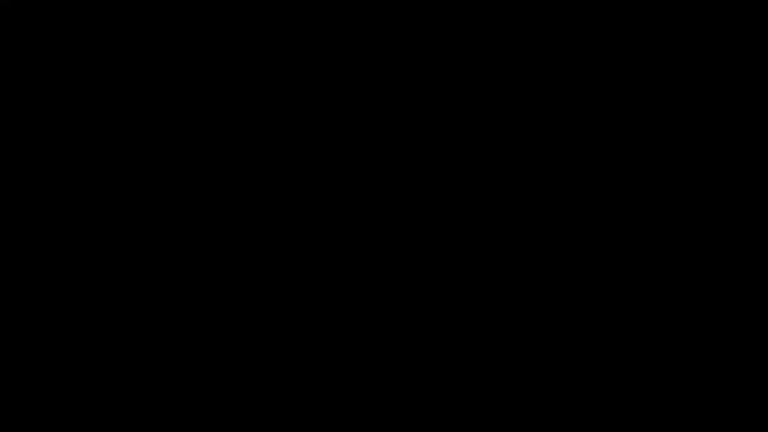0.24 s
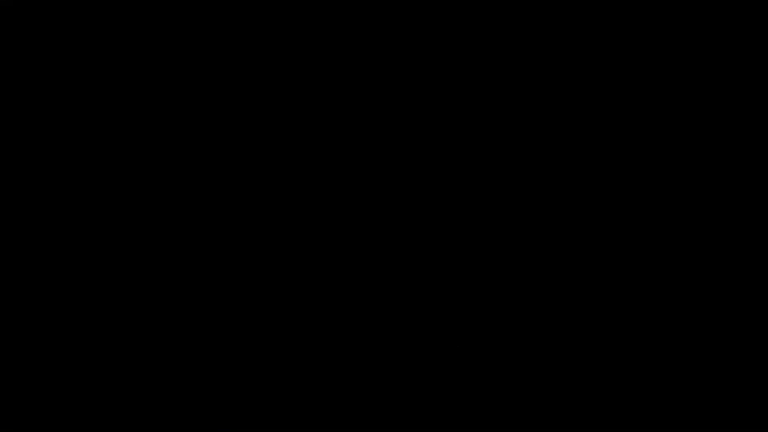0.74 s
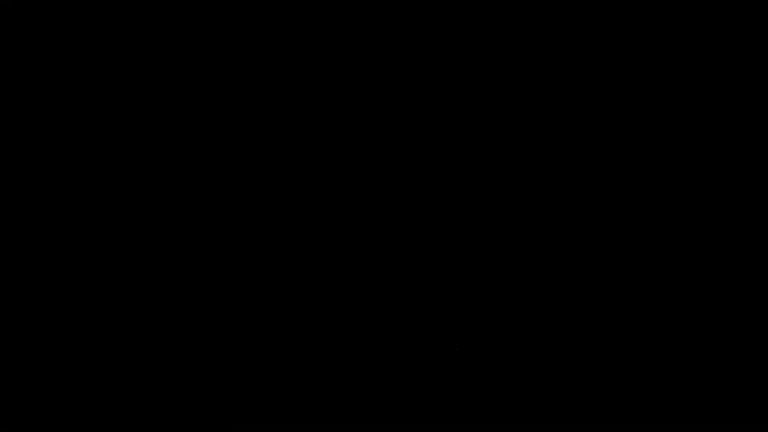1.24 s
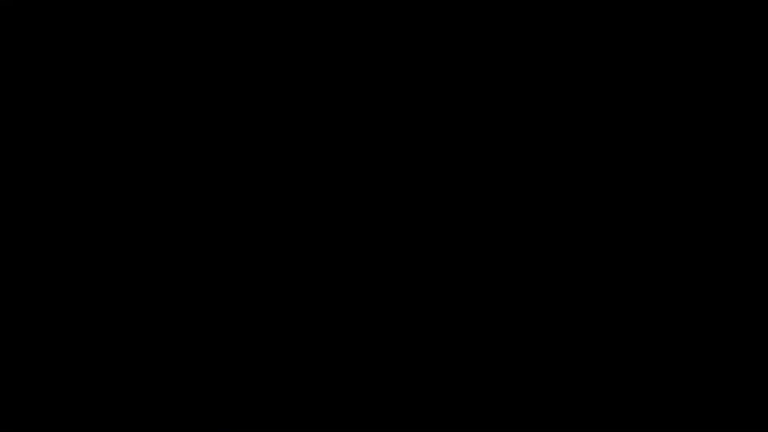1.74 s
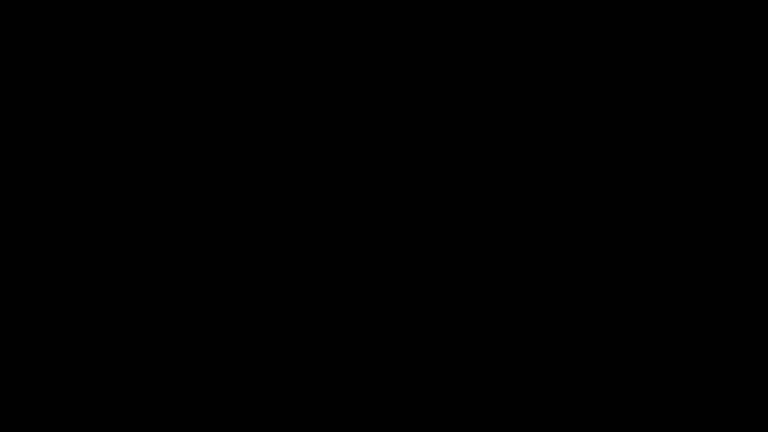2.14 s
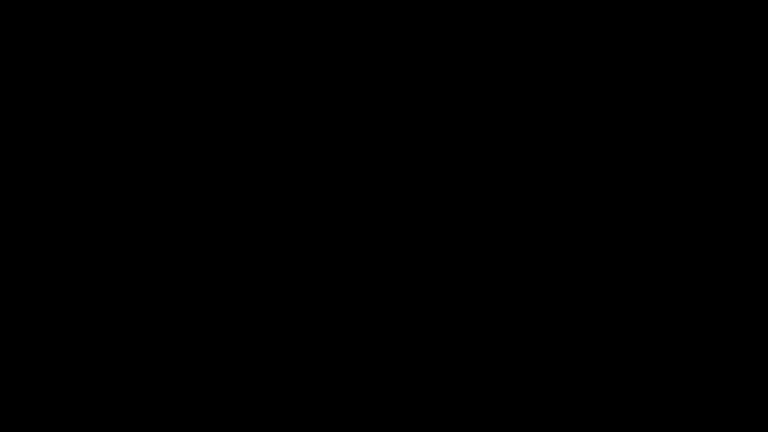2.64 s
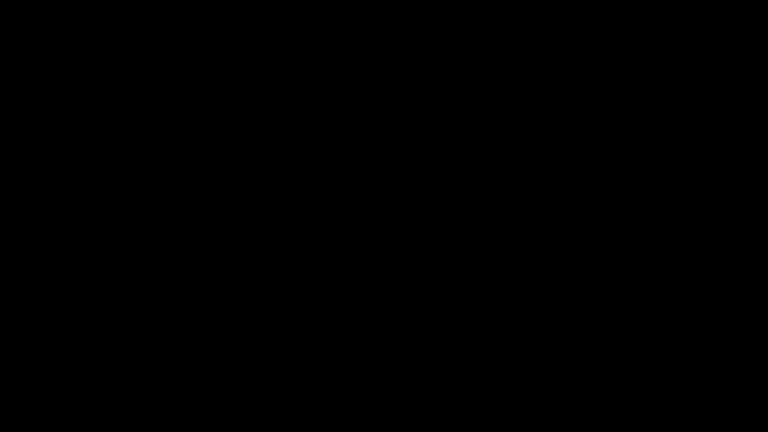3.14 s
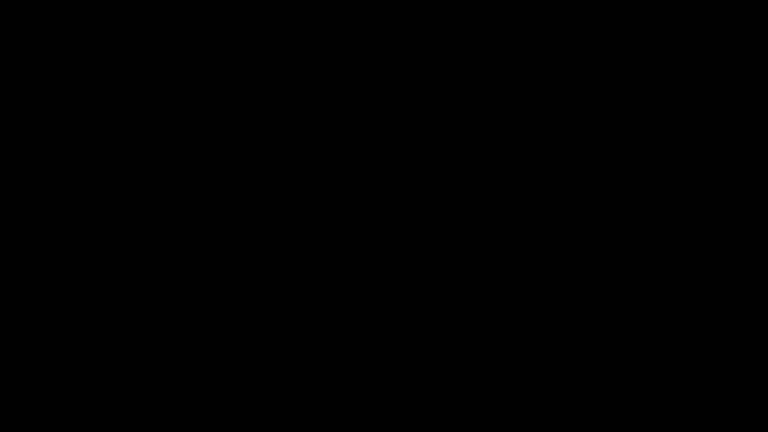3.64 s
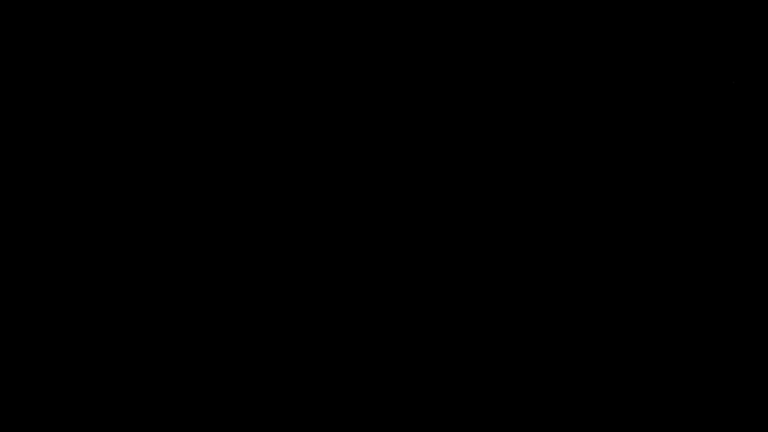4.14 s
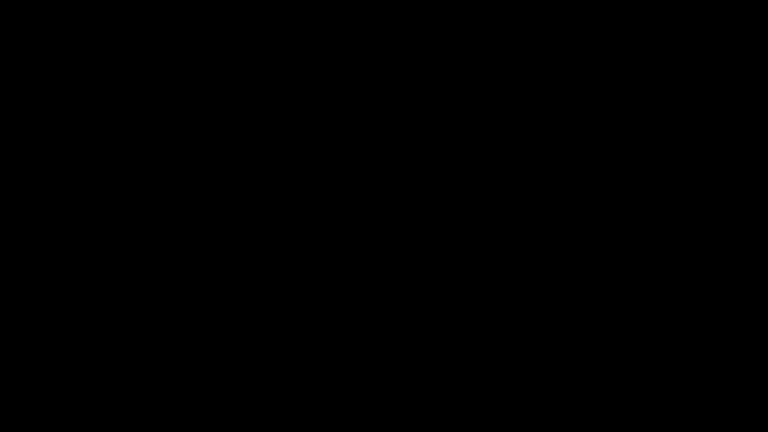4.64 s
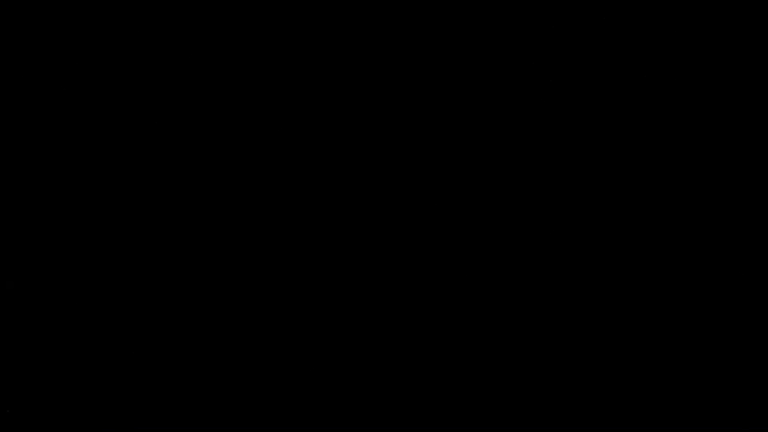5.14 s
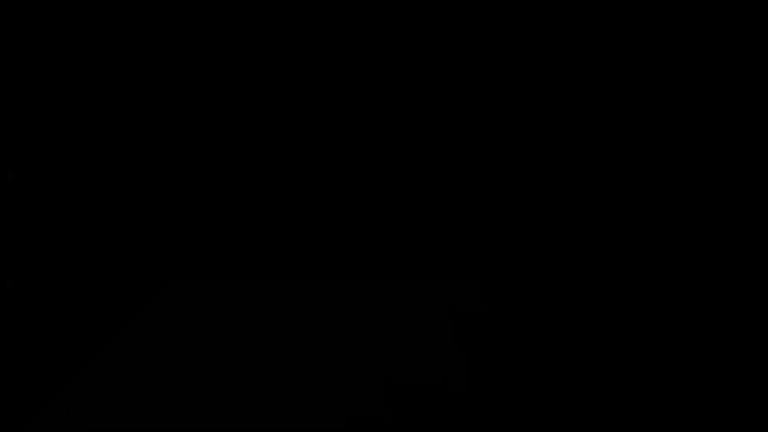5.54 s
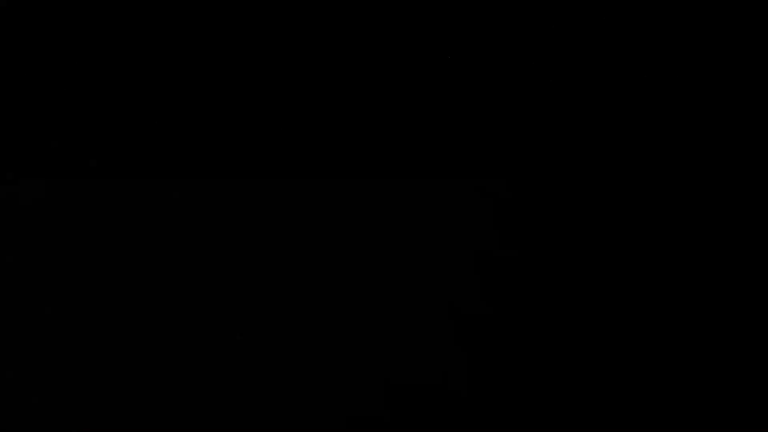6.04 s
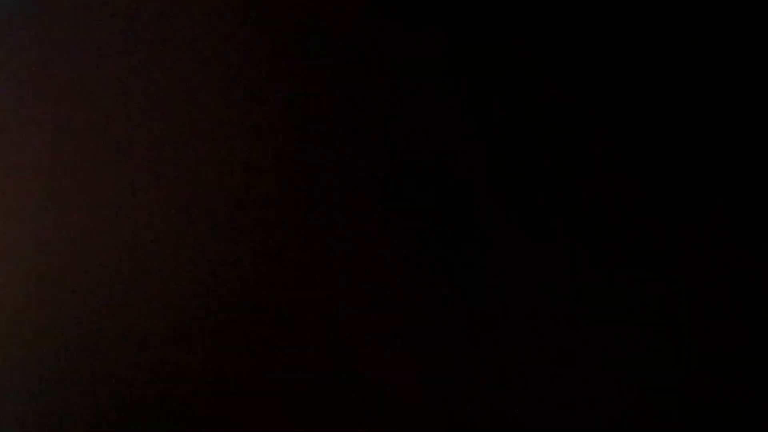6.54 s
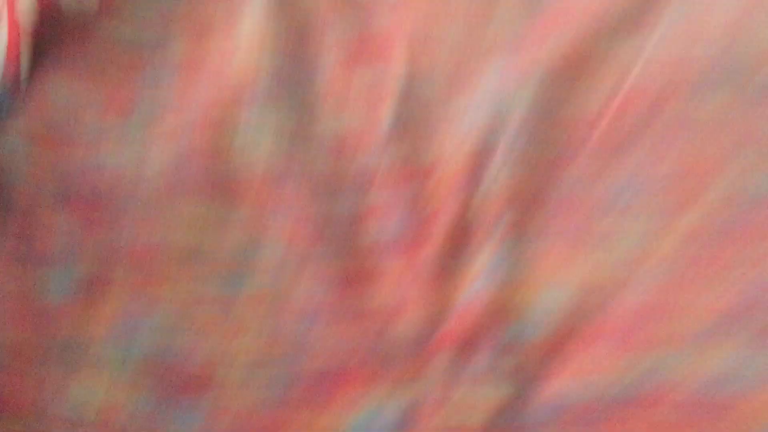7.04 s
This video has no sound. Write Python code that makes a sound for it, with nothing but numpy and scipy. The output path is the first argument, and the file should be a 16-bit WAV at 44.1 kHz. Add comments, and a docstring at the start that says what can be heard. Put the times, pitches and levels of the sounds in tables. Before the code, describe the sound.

Very close to the microphone in a small, quiet room with a steady low hum, fingers tick and scuff on thin plastic. The catch cracks open sharply with a low thud. The case slides with crinkles, clicks and rasps, growing busier and brighter. Cloth and bumps rumble against the microphone, the case clacks down hard, then violent overloaded thumps follow as the recorder is picked up, and it falls back to near quiet.

```python
"""Plastic case handled in a small room

A plastic case is fingered close to a microphone, snaps open, slides about crinkling, then clacks down.
Contacts are noise bursts through resonances; rubbing is random slips; jolts are decaying sines.
The recorder is picked up: cloth rubs on it as shaped noise, and bumps swing low and overload it.
A mains hum of two sines and a faint hiss lie beneath."""
import sys
import numpy as np
from scipy import signal
from scipy.fft import rfft, irfft, next_fast_len
from scipy.io import wavfile
from scipy.ndimage import uniform_filter1d, map_coordinates

SR = 44100
rng = np.random.default_rng(int(sys.argv[2]) if len(sys.argv) > 2 else 0)


def transcribe(signal):
    """Save signal, clipped to [-1, 1], as a 16-bit WAV file at the path in sys.argv[1]."""
    frames = np.atleast_2d(signal).T
    limited = np.clip(frames, -1, 1)
    pcm = np.round(limited * 32767).astype(np.int16)
    wavfile.write(sys.argv[1], SR, pcm)


N = 321048

# All tabulated levels are relative: each source sets its own final gain.
# resonances of thin plastic edges: f/Hz, level/dB
EDGE = [(200, -16.5), (700, 1), (1200, -3), (1900, -14.5), (2700, -5.5), (3700, -3.5), (5000, -13.5),
        (6600, -3.5), (10000, -13), (15000, -4)]
# fingertips scuffing the case: t/s, length/s, level/dB, brightness f/Hz
SCUFFS = [(0, 0.04, -60, 3240), (0.068, 0.032, -46, 1570), (0.115, 0.1, -66, 3650),
          (.383, 0.092, -67, 5940), (0.664, 0.39, -61, 3940), (1.026, 0.43, -60, 3900),
          (1.394, 0.15, -56, 3830), (1.608, 0.14, -57, 3470), (1.952, 0.27, -72, 2007),
          (2.306, 0.33, -62, 3500), (5.303, 0.14, -67, 1870), (5.441, 0.11, -60.5, 1700),
          (5.607, 0.095, -66, 1850), (6.272, 0.033, -54, 2330), (7.233, 0.025, -55, 3000)]
# steady drag of the sliding plastic: t/s, level/dB
SLIDE = [(2.55, -57.5), (2.82, -54.5), (3.23, -46), (3.68, -48.5), (3.92, -39.5), (4.2, -42), (4.36, -37),
         (4.52, -33.5), (4.88, -76)]
# upper spectrum of touches on the recorder: f/Hz, level/dB
CLOTH_HIGH = [(400, -6.5), (1200, -9), (2500, -3.5), (4500, -8.5), (8000, -16), (11000, -19),
              (16000, -24.5)]


def amp(db):
    """Level to amplitude: 20 dB is a factor of ten."""
    return 10 ** (np.asarray(db) / 20)


def unit(x):
    """Normalisation to a root mean square of 1."""
    return x / np.sqrt(np.mean(x ** 2) + 1e-20)


def along(points, hz):
    """Interpolation of (f/Hz, value) points on a logarithmic frequency axis."""
    f, v = np.transpose(points)
    return np.interp(np.log(hz + 1), np.log(f + 1), v)


def gains(rows):
    """Envelopes linear in decibels: one gain per sample for each level column, silent outside the rows."""
    s, *columns = np.transpose(rows)
    now = np.arange(N) / SR
    inside = np.interp(now, s, np.ones(len(s)), 0, 0)
    return [inside * amp(np.interp(now, s, column)) for column in columns]


def gestures(rows, attack_s, release_s):
    """Exponential rise, hold and decay of (t/s, length/s, level/dB, ..) rows, overlaps adding in power."""
    power = np.zeros((len(rows[0]) - 2, N))
    t = np.arange(SR * 3 // 2) / SR
    for s, length, *levels in rows:
        rise = 1 - np.exp(-t / attack_s)
        shape = rise * np.exp(-np.maximum(t - length, 0) / release_s)
        for track, db in zip(power, levels):
            add(track, s, (amp(db) * shape) ** 2)
    return np.sqrt(power)


def wobble(rate):
    """Slow random modulation: a spline through normal noise, rate knots a second."""
    knots = rng.standard_normal(int(N * rate / SR) + 4)
    return map_coordinates(knots, [np.arange(N) * rate / SR])


def filtered(x, response):
    """Linear filtering: the spectrum of x times a response of frequency."""
    m = next_fast_len(N + SR // 2)
    return irfft(rfft(x, m) * response(np.fft.rfftfreq(m, 1 / SR)), m)[:N]


def coloured(x, tone):
    """Spectral shaping of x by a (f/Hz, level/dB) curve, at rms 1."""
    return unit(filtered(x, lambda hz: amp(along(tone, hz))))


def add(track, s, sound):
    """Superposition of a sound on a track from time s, in place."""
    part = track[max(round(s * SR), 0):][:len(sound)]
    part += sound[:len(part)]


def centred(hz, bright_hz, octaves):
    """Contact brightness as a broad bell on log frequency: harder contacts sit higher."""
    return 1 / (1 + (np.log2((hz + 20) / bright_hz) / octaves) ** 2)


def contacts(rows, tone, t60, octaves, ripple_db, size=2048):
    """Impact excitation: a brief crack through the body's resonances, for rows of t/s, level/dB, f/Hz."""
    out = np.zeros(N)
    t = np.arange(size) / SR
    hz = np.fft.rfftfreq(size, 1 / SR)
    # folding the cepstrum gives minimum phase: the body rings only after the blow
    fold = np.r_[1, np.full(size // 2 - 1, 2), np.zeros(size // 2)]
    fade = amp(-60 * t / t60)
    fade_out = np.cos(np.pi / 2 * t / t[-1]) ** 2
    for s, db, bright_hz in rows:
        # each spot favours other modes
        ripple = unit(uniform_filter1d(rng.standard_normal(len(hz)), size=25))
        shape = amp(ripple_db * ripple) * amp(along(tone, hz)) * centred(hz, bright_hz, octaves)
        body = np.exp(rfft(irfft(np.log(shape)) * fold))
        crack = rfft(fade * rng.standard_normal(size))
        # a blow excites all bands alike
        crack /= np.sqrt(uniform_filter1d(np.abs(crack) ** 2, size=31))
        ring = irfft(crack * body) * fade_out
        add(out, s, amp(db) * unit(ring) * np.sqrt(np.mean(fade ** 2)))
    return out


def friction(rate, spread_db, smooth):
    """Stick-slip friction: tiny slips of very unequal size, rate a second, over a smooth hiss."""
    slips = (rng.random(N) < rate / SR) * rng.standard_normal(N)
    slips = slips * amp(spread_db * np.minimum(rng.exponential(size=N), 3))
    grain = np.exp(-np.arange(96) / 20) * rng.standard_normal(96)
    # each slip lends its decaying energy to fresh noise
    scatter = np.sqrt(np.abs(signal.fftconvolve(slips ** 2, grain ** 2)[:N]))
    clumps = unit(scatter * rng.standard_normal(N))
    return unit(clumps + smooth * rng.standard_normal(N))


def patchy(x, depth_db):
    """Shifting contact point: the resonances that speak come and go, as a random gain in time and frequency."""
    z = signal.stft(x, nperseg=512)[2]
    field = uniform_filter1d(rng.standard_normal(z.shape), size=9, axis=0)
    field = uniform_filter1d(field, size=10, axis=1)
    return unit(signal.istft(z * amp(depth_db * unit(field)), nperseg=512)[1][:N])


def background():
    """Mains hum at twice the line rate with a weak subharmonic, plus broadband air noise."""
    # hum, steady until the recorder is moved: t/s, level/dB
    hum_level = [(0, -43.5), (4.95, -43), (5.35, -50.5), (5.8, -41), (6.4, -43), (6.75, -60.5), (7, -57),
                 (7.28, -44.5)]
    # faint air noise of the room: f/Hz, level/dB
    air_tone = [(30, -5.5), (60, -5), (200, -8), (450, -22.5), (1000, -26), (1800, -24), (3200, -23.5),
                (6000, -29.5), (10000, -39), (16000, -39.5)]
    phase = 2 * np.pi * np.cumsum(118.6 + 0.24 * wobble(3.3)) / SR
    tones = np.sin(phase) + amp(-20.5) * np.sin(phase / 2)
    hum = gains(hum_level)[0] * np.sqrt(2) * tones
    return hum + amp(-65.5) * coloured(rng.standard_normal(N), air_tone)


def room(x):
    """Diffuse reverberation: noise that builds in a few milliseconds and decays fastest at the top."""
    # decay times of the room: f/Hz, t60/s
    decay = [(100, 0.45), (260, 0.18), (700, 0.35), (1840, 0.32), (4850, 0.25), (12800, 0.067)]
    hz, t, z = signal.stft(rng.standard_normal(SR * 3 // 4), SR, nperseg=256)
    fade = amp(-60 * t / along(decay, hz)[:, None])
    tail = signal.istft(z * fade, SR, nperseg=256)[1]
    tail = tail * (1 - np.exp(-np.arange(len(tail)) / SR / 0.004))
    return signal.fftconvolve(x, tail / np.linalg.norm(tail))[:N]


def handling():
    """Rubbing noise: hands rustle low on the case, and cloth drags over the recorder in lumps."""
    # hands shifting their grip: t/s, length/s, level/dB
    grip_rows = [(.05, .12, -50.5), (.4, .7, -62.5), (1.2, 0.39, -48.5), (1.75, 0.59, -51.5),
                 (2.56, .32, -47), (3.09, 0.11, -40), (3.78, .08, -49), (4.15, .4, -50.5),
                 (4.64, 0.041, -44), (5.02, 0.21, -45), (5.45, 0.23, -50), (5.78, .6, -48.5),
                 (6.52, 0.061, -42), (6.66, .08, -46), (6.93, .04, -47), (7.2, 0.088, -46)]
    # spectrum of the grip: f/Hz, level/dB
    grip_tone = [(25, -10.5), (55, 5.5), (110, 5), (200, -1), (300, -9.5), (500, -22), (1200, -22),
                 (3000, -45)]
    # cloth rubbing on the recorder: t/s, length/s, rumble level/dB, hiss level/dB
    cloth_rows = [(4.974, 0.017, -34.5, -54.5), (4.996, 0.071, -30.5, -44.5), (5.064, 0.16, -24.5, -39.5),
                  (5.134, 0.028, -15.5, -30.5), (5.23, 0.031, -41.5, -45.5), (6.37, .07, -36, -50.5),
                  (6.45, 0.086, -42.5, -59), (6.56, 0.081, -48.5, -62), (6.62, 0.12, -45, -51.5),
                  (6.74, .1, -62.5, -54.5), (6.84, 0.095, -72, -59), (6.935, 0.016, -52, -63)]
    # spectrum of the cloth rumble: f/Hz, level/dB
    rumble_tone = [(25, -12), (60, -1), (130, 0), (300, -5), (600, -9), (1200, -15), (2500, -27),
                   (5000, -50)]
    resting = amp(-59.5)  # the hands held still
    grip = resting + gestures(grip_rows, attack_s=0.016, release_s=0.027)[0] * amp(-1.5)
    sway = amp(8.9 * np.tanh(wobble(8.2)))
    rustle = grip * sway * coloured(rng.standard_normal(N), grip_tone)
    rumble, hiss = gestures(cloth_rows, attack_s=0.0039, release_s=0.014)
    lumps = amp(4.5 * np.tanh(wobble(90)) - 1)
    low = rumble * lumps * coloured(rng.standard_normal(N), rumble_tone)
    fibres = coloured(friction(rate=2500, spread_db=0.5, smooth=1.2), CLOTH_HIGH)
    return rustle + low + hiss * amp(1) * np.sqrt(lumps) * fibres


def bumps():
    """Softening contact: each bump on the recorder is a heavy swing gliding to 85 Hz, with a small click."""
    # bumps on the recorder's body: t/s, level/dB, starting f/Hz, time to peak/s, click level/dB
    bump_rows = [(1.362, -35.5, 300, .0096, -70), (1.442, -36, 307, 0.013, -70),
                 (5.015, -17.5, 696, 0.003, -54.5), (5.043, -11.5, 153, 0.0048, -41),
                 (5.0908, 0, 200, 0.0043, -52), (5.1317, -3.5, 790, 0.0028, -17),
                 (5.16, -10.5, 1224, 0.0019, -13), (5.1639, -2, 190, 0.0021, -34),
                 (6.39, -12.5, 397, 0.0012, -34), (6.3942, 2.5, 1110, 0.0018, -7),
                 (6.399, 4.5, 240, .003, -8.5), (6.411, 9, 804, 0.0028, -8), (6.4268, 0, 666, 0.0012, -17),
                 (6.43, 11.5, 271.7, .0034, -21.5), (6.4882, -13, 710, 0.0037, -30.5),
                 (6.504, -13, 970, 0.0018, -16), (6.508, -3.5, 161, 0.0037, -39),
                 (6.638, -25, 790, 0.0027, -41), (6.722, -32, 597, 0.0027, -35)]
    out = np.zeros(N)
    t = np.arange(SR // 6) / SR
    for s, db, start_hz, swell, _ in bump_rows:
        u = t / swell
        hz = 85 + (start_hz - 85) * np.exp(-u / 1.055)
        envelope = u * np.exp((1 - u ** 1.25) / 1.25)
        swing = envelope * np.sin(2 * np.pi * np.cumsum(hz) / SR)
        # the whole body also rocks in the hand
        sway = amp(-16 - 60 * t / 0.09) * np.sin(2 * np.pi * 55 * t)
        add(out, s, amp(db) * (swing + sway))
    clicks = [(row[0], row[-1], 2200) for row in bump_rows]
    return out + amp(-3) * contacts(clicks, CLOTH_HIGH, t60=0.005, octaves=1.5, ripple_db=3)


def thuds():
    """Modal excitation: jolts set the low modes of the support and the room swinging."""
    # jolts of the case on its support: t/s, level/dB, damping factor (1 = free)
    jolts = [(0.1, -30.5, 2.5), (1.238, -27.5, 4.9), (1.711, -12.5, 1.5), (2.886, -14.5, 7.5),
             (3.093, -24, 3.3), (4.156, -22.5, 4.7), (5.974, -17, 2.7)]
    # modes of support and room: f/Hz, level/dB, free t60/s
    modes = [(54, -6, 0.61), (83.9, -2, 0.56), (107, -14.5, 2.5), (112, -5, 0.2), (135.3, -3.5, 0.65),
             (166, -9, 0.56), (221.8, -4, 0.23)]
    out = np.zeros(N)
    t = np.arange(SR) / SR
    for s, db, damping in jolts:
        ring = np.zeros(len(t))
        for k, (hz, level, t60) in enumerate(modes):
            decay = amp(level - 60 * t * damping / t60)
            ring += (-1) ** k * decay * np.sin(2 * np.pi * hz * t)  # alternate modes start inverted
        add(out, s, amp(db) * ring * (1 - np.exp(-t / 0.011)))
    return out


def scuffs():
    """Sparse stick-slip: a fingertip's brief drag swells through the resonances of thin edges."""
    out = np.zeros(N)
    slips = coloured(friction(rate=300, spread_db=4.5, smooth=0.55), EDGE)
    slips = patchy(slips, depth_db=3.5)
    for s, length, db, bright_hz in SCUFFS:
        stroke = slips[max(round(s * SR), 0):][:round(length * SR)]
        stroke = stroke * signal.windows.tukey(len(stroke), 0.6)
        bell = centred(np.fft.rfftfreq(len(stroke), 1 / SR), bright_hz, octaves=0.76)
        add(out, s, amp(db) * unit(irfft(rfft(stroke) * bell)))
    return out


def stray_ticks():
    """Random micro-impacts while anything rubs, following its strength: rows of t/s, level/dB, f/Hz."""
    per_s, spread_db = 34, 1
    middle_hz, spread_octaves = 4600, 0.3
    over_scuff_db, over_slide_db = 23, 7.5
    touch, = gestures([row[:3] for row in SCUFFS], attack_s=0.057, release_s=0.005)
    strength = amp(over_scuff_db) * touch + amp(over_slide_db) * gains(SLIDE)[0]
    slot = SR // 100  # at most one tick each 10 ms
    slots = np.arange(0, N - slot, slot)
    chance, lag = rng.random((2, len(slots)))
    size, colour = np.clip(rng.standard_normal((2, len(slots))), -2, 2)
    at = slots + (lag * slot).astype(int)
    level_db = 20 * np.log10(strength[at] + 1e-9) + spread_db * size
    rows = np.c_[at / SR, level_db, middle_hz * 2 ** (spread_octaves * colour)]
    return rows[(chance < per_s / 100) & (strength[at] > amp(-60))]


def ticks():
    """Light impacts: fingers and edges tick on thin plastic, with stray ticks from the rubbing."""
    # the clearest ticks: t/s, level/dB, brightness f/Hz
    clear_ticks = [(0.0835, -25.5, 3100), (0.4732, -30, 5200), (0.5662, -24.5, 4100), (0.7306, -32, 7000),
                   (0.7844, -24.5, 4500), (0.828, -29.5, 3920), (0.8582, -24, 4240), (0.8722, -23, 4630),
                   (0.9811, -27.5, 6440), (0.989, -20, 3700), (1.1516, -25.5, 3260), (1.4734, -27, 4570),
                   (1.529, -28, 3440), (1.5582, -23.5, 3500), (1.566, -21, 3360), (1.678, -22, 4025),
                   (2.1825, -35.5, 13300), (2.326, -28.5, 3210), (2.6274, -24, 2594), (2.679, -16, 3160),
                   (2.7355, -12.5, 3080), (2.7726, -16.5, 3600), (2.8835, -7.5, 3180),
                   (2.9733, -24.5, 6800), (3.192, -24, 3250), (3.235, -21, 4240), (3.29, -16.5, 3660),
                   (3.7232, -17.5, 4000), (4.098, -25, 4650), (4.1905, -8.5, 4620), (4.279, -8.5, 8400),
                   (4.3065, -10, 5130), (4.3725, -6.5, 7100), (4.625, -14, 3860), (4.7913, -24, 2740)]
    rows = [*clear_ticks, *stray_ticks()]
    return amp(-5.5) * contacts(rows, EDGE, t60=0.0055, octaves=0.83, ripple_db=4.5)


def sliding():
    """Stick-slip sliding: clumpy crinkle, a rasp where shoves catch, and more treble in a harder drag."""
    # shoves of the case: t/s, length/s, crinkle level/dB, rasp level/dB
    shoves = [(2.719, 0.028, -41, -37.5), (2.765, 0.021, -37, -41), (2.837, .045, -35, -39),
              (2.883, 0.0071, -28.5, -23.5), (3.068, 0.051, -36, -35.5), (3.717, 0.019, -36, -49),
              (4.143, 0.065, -29.5, -28), (4.275, 0.0053, -42, -29), (4.338, 0.086, -33, -32.5),
              (4.468, 0.058, -30, -35.5), (4.625, 0.036, -36, -43.5), (4.69, .045, -44, -55.5),
              (4.831, 0.0063, -48, -43)]
    # spectrum of the crinkle: f/Hz, level/dB
    crinkle_tone = [(100, -5), (200, -2), (450, -11.5), (800, -6), (1300, -5), (1900, -6.5), (2700, -5),
                    (3700, -2), (5000, -4), (6500, -6), (9000, -10), (10600, -15), (14000, -11),
                    (16000, -15.5)]
    # spectrum of the rasp: f/Hz, level/dB
    rasp_tone = [(100, -17), (200, 8), (500, -4.5), (1200, 3.5), (2000, -10), (3700, 5), (5000, -8),
                 (6500, 3), (8500, -1.5), (10600, -8), (13000, -3.5), (16000, -26)]
    treble_per_db, neutral_db = 0.22, -38.5  # treble dB per dB of steady drag; drag level of plain tone
    steady = gains(SLIDE)[0]
    shoved = gestures(shoves, attack_s=0.0049, release_s=0.019)[0]
    effort = np.hypot(amp(2) * steady, shoved)
    crinkle = coloured(friction(rate=800, spread_db=4, smooth=0.45), crinkle_tone)
    glide = effort * amp(-1.5 + 2.64 * wobble(70)) * crinkle
    press = gestures(shoves, attack_s=0.0009, release_s=0.0053)[1]
    rasp = press * coloured(friction(rate=2000, spread_db=8.0, smooth=1.0), rasp_tone)
    drag = glide + rasp
    treble = filtered(drag, lambda hz: hz ** 2 / (hz ** 2 + 3500 ** 2))
    tilt = np.maximum(steady / amp(neutral_db), 0.1) ** treble_per_db
    drag = tilt * treble + (drag - treble) / np.maximum(tilt, 0.5)  # the rest tilts the other way
    return np.std(drag) * patchy(drag, depth_db=2.1)


def clacks():
    """Shell resonance: the hollow case knocks, radiating from its near and far sides."""
    # knocks of the case: t/s, level/dB, brightness f/Hz
    knocks = [(0.085, -37, 800), (2.736, -34, 700), (2.885, -17.5, 450), (5.475, -35, 1500),
              (5.514, -33, 2200), (5.533, -36, 2200), (5.619, -36.5, 2200), (5.656, -37, 2400),
              (5.749, -47.5, 2600), (5.8052, -24, 4000), (5.8461, -29.5, 3300), (5.9464, -32.5, 2300),
              (5.9605, -9, 2200), (5.9765, -7.5, 2200), (6.1733, -39, 2800), (6.2806, -33, 2800),
              (6.6388, -29, 700), (7.134, -49, 1500), (7.244, -30.5, 2200), (7.266, -37, 3500)]
    # resonances of the hollow shell: f/Hz, level/dB
    shell = [(100, -8), (250, 8), (550, 5), (904, 5), (1400, -5.5), (2150, -1), (2700, 0.5), (3400, -5),
             (4300, -10), (5730, -15.5), (9000, -27.5), (16000, -28)]
    near = amp(-2.5) * contacts(knocks, shell, t60=0.019, octaves=2.1, ripple_db=0.0)
    far = contacts(knocks, shell, t60=0.01, octaves=1.5, ripple_db=1.7)
    return near, far


def snap():
    """Release of stored strain: the catch springs free in a double crack, and the loosened lid shivers."""
    # two steps of the catch letting go: t/s, level/dB, brightness f/Hz
    cracks = [(1.7001, 3.999, 3435), (1.704, 5, 1720)]
    # resonances of the stiff catch: f/Hz, level/dB
    catch_tone = [(150, -24.5), (480, 0.5), (850, -8), (1350, -4), (2000, -12), (2600, -4.5), (3600, -2),
                  (4500, -9.5), (6200, -5), (8500, -10), (12000, -15.5), (15000, -9)]
    t = np.arange(SR // 4) / SR
    shiver = np.zeros(N)
    add(shiver, cracks[-1][0], amp(-23 - 60 * t / 0.17))
    double = amp(-8.0) * contacts(cracks, catch_tone, t60=0.017, octaves=1.7, ripple_db=-1.0)
    return double + shiver * coloured(rng.standard_normal(N), catch_tone)


def scene():
    """Direct and reverberant sound: the room hears the ticks, the rubbing, the snap and the case's far sides;
    thuds, bumps, handling and the background stay dry."""
    near, far = clacks()
    catch = snap()
    rubbing = sliding() + scuffs()
    direct = thuds() + bumps() + handling() + background()
    ticking = ticks()
    wet = room(amp(-15) * ticking + amp(-11.5) * rubbing)
    wet += amp(-15.0) * room(far) + amp(-15) * room(catch)
    return ticking + near + catch + rubbing + wet + direct


def record(dry):
    """Transducer limits: the microphone loses deep bass, saturates on hard blows and is band-limited."""
    top_hz = 16100
    highpass = signal.butter(2, 30, "highpass", fs=SR, output="sos")
    voltage = signal.sosfilt(highpass, dry)
    clipped = voltage / (1 + np.abs(voltage) ** 8) ** (1 / 8)
    return filtered(clipped, lambda hz: 1 / np.sqrt(1 + (hz / top_hz) ** 200))


dry = scene()
out = record(dry)
transcribe(out)
```